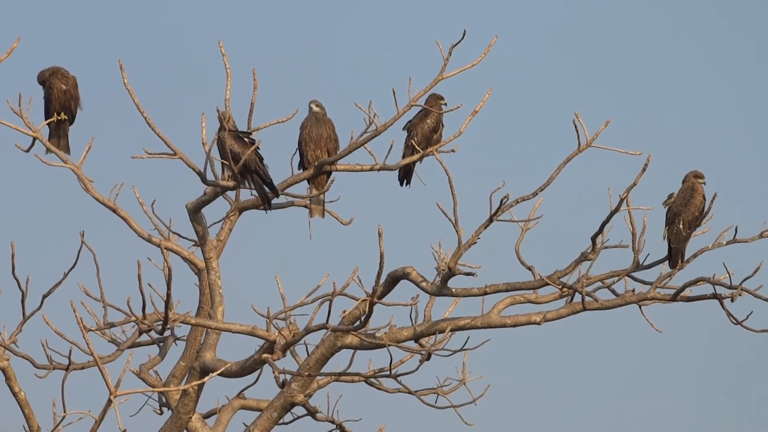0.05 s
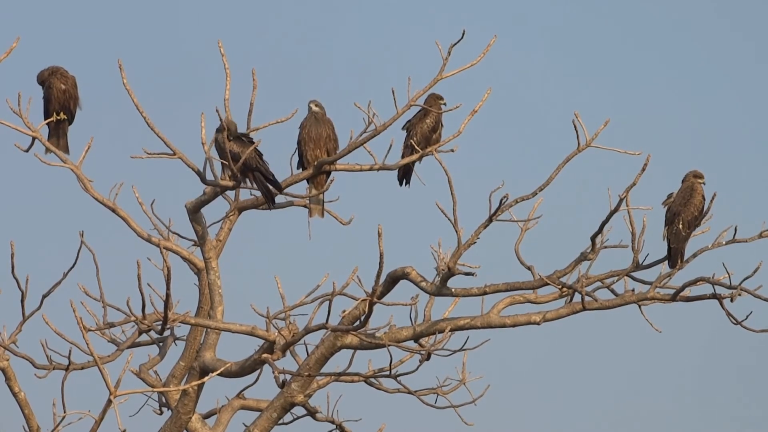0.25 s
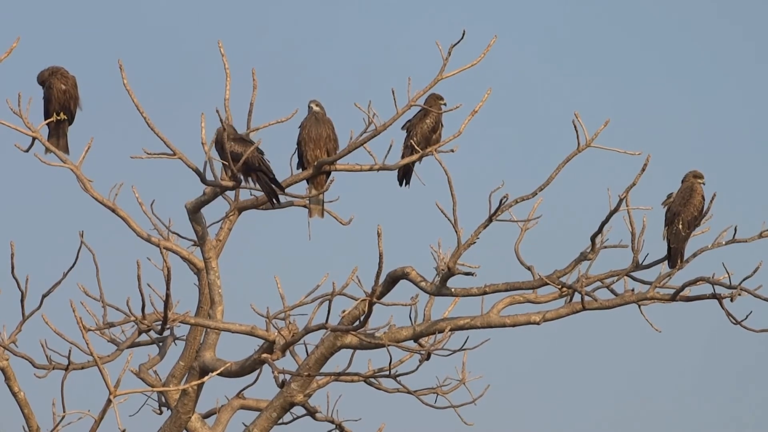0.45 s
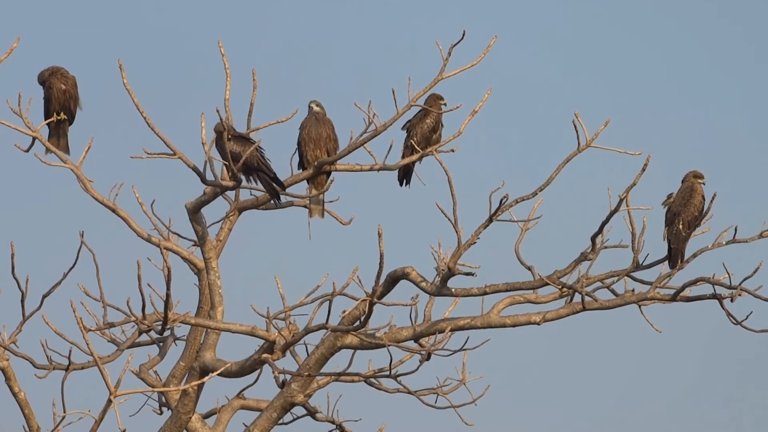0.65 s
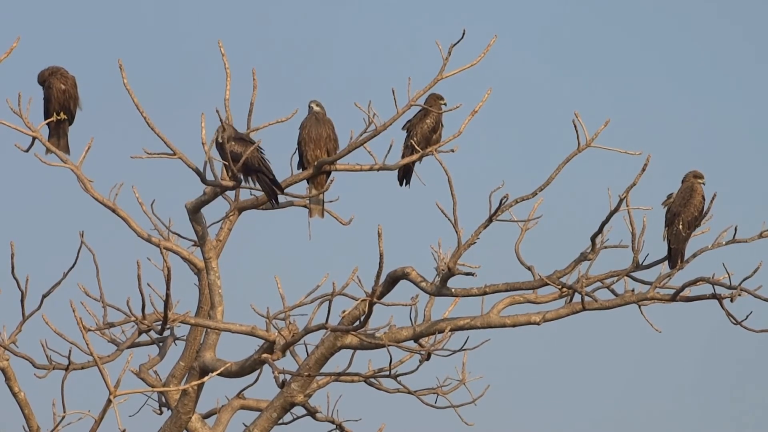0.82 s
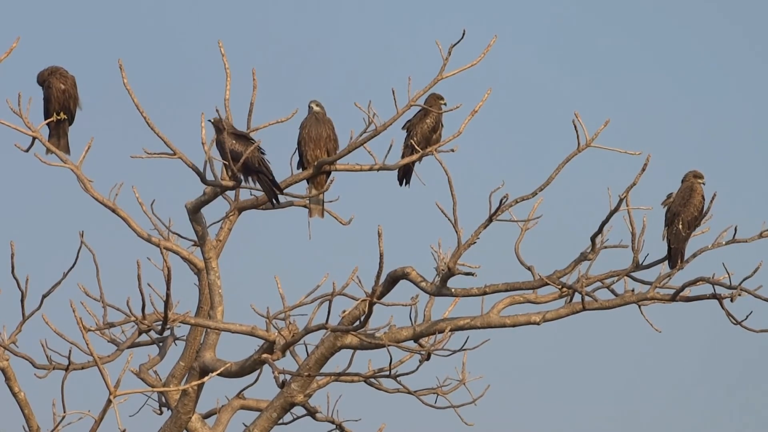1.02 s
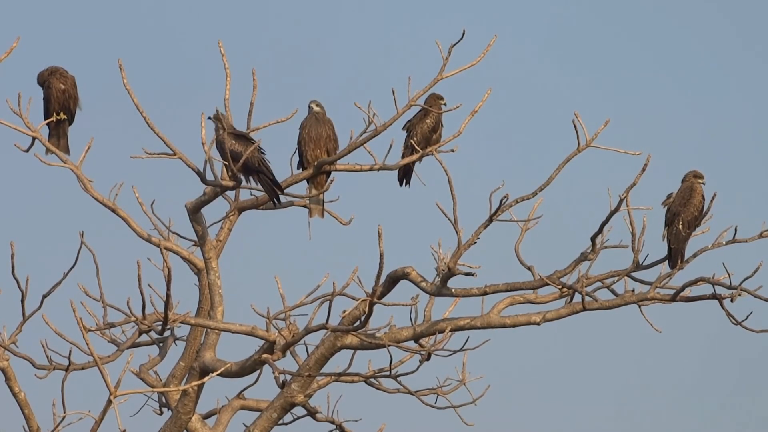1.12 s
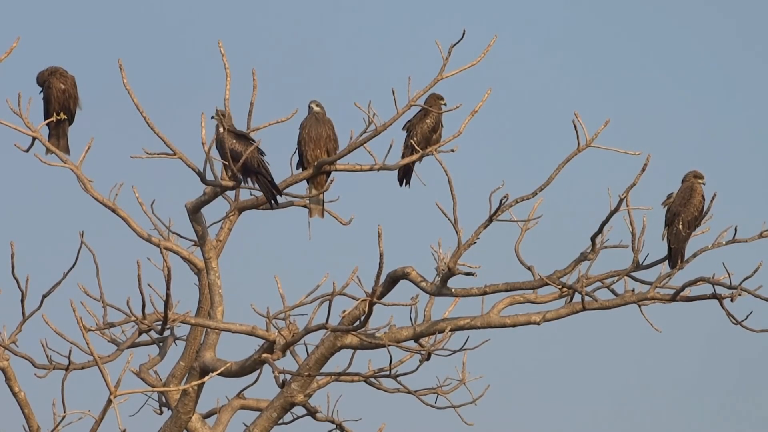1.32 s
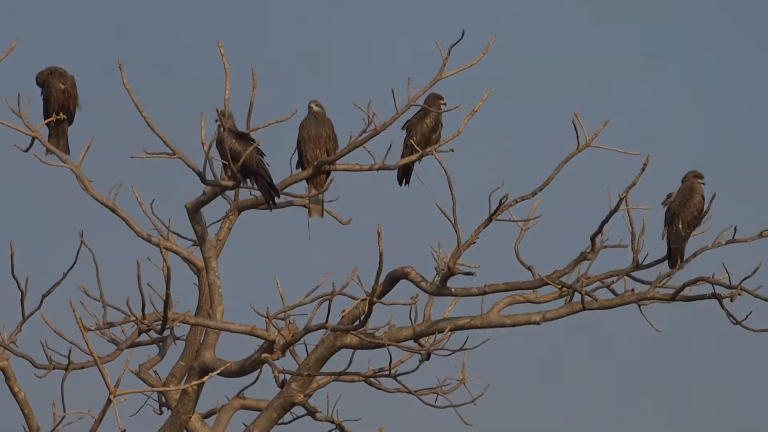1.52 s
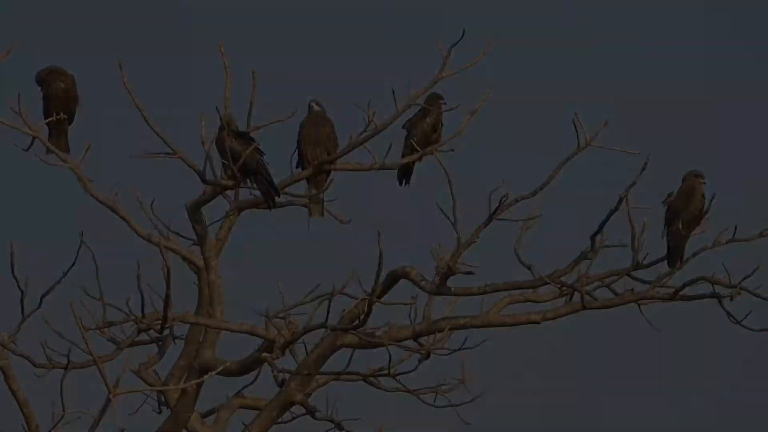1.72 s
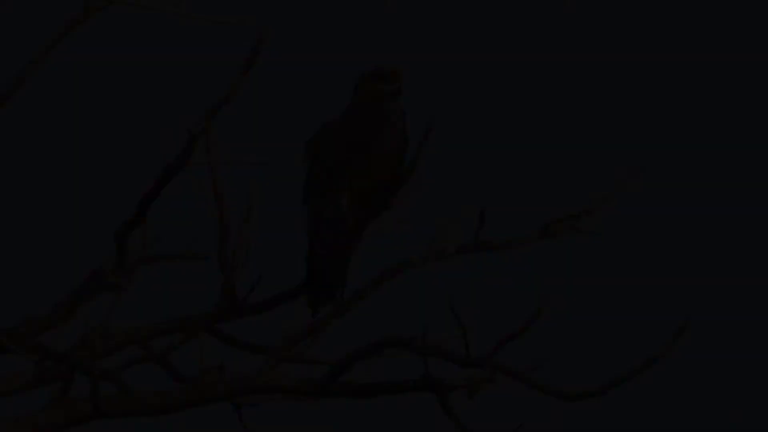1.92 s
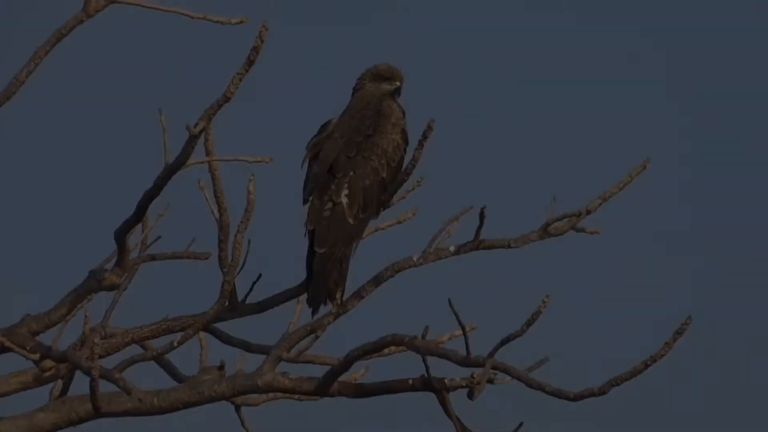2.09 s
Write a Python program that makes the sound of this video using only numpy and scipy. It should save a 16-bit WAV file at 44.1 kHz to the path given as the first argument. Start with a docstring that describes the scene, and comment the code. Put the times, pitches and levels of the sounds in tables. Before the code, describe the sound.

A bird of prey's thin, gliding whistle outdoors, with wind rumble and faint chirps.

```python
"""Over a quiet outdoor hiss, gusts of wind buffet the microphone throughout. Kites perch in a bare tree:
as earlier whistling dies away, a thin whistle sweeps up and down, rasps at its breaks and scatters
back from the trees around. Two soft knocks and a faint feathery rustle pass. Then a small bird ticks
twice among distant peeps and small dry snaps, and at the end a far crow gives two hoarse caws."""
import sys
import numpy as np
from scipy import signal
from scipy.fft import rfft, irfft
from scipy.io import wavfile
from scipy.ndimage import uniform_filter1d

SR = 44100
rng = np.random.default_rng(int(sys.argv[2]) if len(sys.argv) > 2 else 0)


def dump(signal):
    """Clip the signal to [-1, 1] and save it as 16-bit WAV at the path in sys.argv[1]."""
    limited = np.clip(np.atleast_2d(signal).T, -1, 1)
    pcm = np.round(limited * 32767).astype(np.int16)
    wavfile.write(sys.argv[1], SR, pcm)


N = 94815
TIME = np.arange(N) / SR
SIDE = np.array([[1], [-1]])   # adds to the left, subtracts from the right


def from_db(db):
    """Decibels to gain."""
    return 10 ** (np.asarray(db) / 20)


def unit_rms(x):
    """Scale to an rms of 1."""
    return x / np.sqrt(np.mean(x ** 2) + 1e-20)


def curve(points):
    """Automation line through (t/s, value) points."""
    return np.interp(TIME, *np.transpose(points))


def drift(rate_hz):
    """Random modulator: noise low-passed at the given rate, with an rms of 1."""
    pole = np.exp(-2 * np.pi * rate_hz / SR)
    return unit_rms(signal.lfilter([1], [1, -2 * pole, pole * pole], rng.standard_normal(2 * N))[N:])


def colour(x, eq):
    """Equalise by (f/Hz, gain/dB) points joined on a log frequency axis."""
    hz, db = np.transpose(eq)
    bins_hz = np.arange(N // 2 + 1) * SR / N
    return irfft(rfft(x) * from_db(np.interp(np.log(bins_hz + 1), np.log(hz), db)), N)


def noise(spectrum):
    """Coloured noise with an rms of 1."""
    return unit_rms(colour(rng.standard_normal(N), spectrum))


def stereo_noise(spectrum, width):
    """Mid/side noise whose width depends on frequency."""
    return noise(spectrum) + SIDE * colour(noise(spectrum), width)


def phase_of(hz):
    """Running phase of a pitch curve."""
    return 2 * np.pi * np.cumsum(hz) / SR


def bell(offset, spread):
    """Gaussian swell that peaks at 1 where the offset is zero."""
    return np.exp(-.5 * (offset / spread) ** 2)


def scatter(x, t60_s, build_s):
    """Countless small reflections from twigs and leaves, building up and dying away."""
    envelope = from_db(-60 * TIME / t60_s) * (1 - np.exp(-(TIME / build_s) ** 2))
    mid, side = rng.standard_normal((2, N)) * envelope
    response = unit_rms(mid + from_db(-14.5) * side * SIDE) / np.sqrt(N)
    return signal.fftconvolve(x[None], response, axes=1)[:, :N]


def trees(x):
    """Near trees send back a short tail, far trees a longer, softer one."""
    near = from_db(-8) * scatter(x, t60_s=0.38, build_s=0.0058)
    far = from_db(-11.5) * scatter(x, t60_s=0.94, build_s=0.0058)
    return near + far


def outdoor_hiss():
    """A quiet, wide bed of air whose level barely moves."""
    spectrum = [(40, -0.5), (120, 0.5), (210, -5.5), (300, -17), (600, -15), (900, -21), (1400, -25),
                (3000, -30.5), (7000, -33.5), (9000, -35), (12000, -40)]   # tone of the hiss: f/Hz, level/dB
    width = [(100, -15.5), (500, -2.5), (1500, 1.5), (3000, -2), (6000, -4), (10000, -27.5)]   # side against mid: f/Hz, gain/dB
    ride = [(0, 0), (1.0, 1.1), (1.92, 2.66), (1.96, 0.5), (2.15, 1.5)]   # slow level ride: t/s, gain/dB
    return from_db(-68 + curve(ride)) * stereo_noise(spectrum, width)


def wind():
    """Turbulence at the microphone: a fluttering rumble that follows the gusts."""
    gusts = [(0, -69), (.1, -64), (.2, -64), (.28, -70), (.38, -54.5), (.47, -46), (.58, -50), (.72, -61.5),
             (.8, -59.5), (.88, -48.5), (1.0, -61.5), (1.09, -53), (1.15, -64), (1.39, -59), (1.46, -48),
             (1.62, -59.5), (1.71, -50.5), (1.82, -64.5), (1.88, -52.5), (1.95, -67.5), (2.15, -60)]   # strength of the turbulence: t/s, level/dB
    spectrum = [(20, -6.5), (45, 4.5), (90, 0), (140, -6.5), (210, -12), (300, -20.5), (450, -29),
                (900, -43.5), (2000, -61), (6000, -110)]   # tone of the rumble: f/Hz, level/dB
    width = [(30, -11), (80, -11), (150, -6.5), (260, 0.5), (600, -2.5)]   # side against mid: f/Hz, gain/dB
    return from_db(curve(gusts) + 3.65 * drift(25)) * stereo_noise(spectrum, width)


def whistle_tail():
    """Earlier whistling, blurred to a band of noise, still dying away in the trees."""
    spectrum = [(2600, -50), (3300, 0.5), (3800, -2), (4200, 4), (4700, -8), (5500, 4), (6300, -20),
                (7500, -53)]   # tone of the tail: f/Hz, level/dB
    t60_s = 0.87
    return from_db(-75 - 60 * TIME / t60_s) * noise(spectrum)


def whistle():
    """A kite's nearly pure tone glides through each note, rougher in fast sweeps, and echoes back."""
    notes = [
        [(0.0, 3236, -62.5), (0.010, 3360, -58.5), (0.019, 3520, -64), (0.027, 2930, -70)],
        [(0.083, 3940, -69), (0.102, 4480, -78), (0.114, 4300, -85), (0.125, 4123, -58), (0.135, 3590, -77),
         (0.147, 3423, -55), (0.157, 3287, -62), (0.166, 3386, -63.5), (0.177, 4400, -64.5)],
        [(0.178, 4250, -76), (0.187, 4710, -58.5), (0.193, 4810, -52.5), (0.203, 5100, -52.5),
         (0.214, 5320, -50.5), (0.222, 5720, -43.5), (0.230, 6300, -67), (0.238, 5660, -48), (0.246, 4650, -55),
         (0.254, 3830, -70.5), (0.260, 3400, -53.5), (0.270, 2500, -83.5)],
        [(0.338, 5620, -85), (0.345, 5160, -51.5), (0.350, 4200, -83), (0.355, 2800, -61.5)],
        [(0.348, 7000, -74), (0.353, 5436, -52.5), (0.358, 4580, -60.5), (0.364, 3770, -65),
         (0.370, 3200, -62.5), (0.380, 3230, -65), (0.390, 3250, -58.5)],
        [(0.396, 4180, -66), (0.405, 3300, -66), (0.413, 2650, -78.5)],
        [(0.402, 6090, -58), (0.408, 5120, -62), (0.419, 4070, -65), (0.428, 3500, -64), (0.440, 3300, -65.5)],
        [(0.488, 5760, -62), (0.498, 5540, -54), (0.510, 5265, -57.5), (0.526, 4680, -51.5),
         (0.534, 4360, -68.5), (0.546, 3970, -67), (0.556, 3840, -66.5), (0.580, 3740, -68.5),
         (0.597, 3950, -64.5), (0.605, 4140, -59.5), (0.618, 4317, -61.5), (0.632, 4150, -56.5),
         (0.643, 3710, -78)],
    ]   # one contour per note: t/s, f/Hz, level/dB
    echoes = [(.0045, -7), (0.054, -19)]   # reflections off near surfaces: delay/s, gain/dB
    waver, break_waver = 0.0064, 0.024   # fractions of the pitch
    break_hz_per_s, fade_s, overtone_db = 108000, 0.0016, -43.5
    voice = np.zeros(N)
    for note in notes:
        t, hz, db = np.transpose(note)
        pitch = uniform_filter1d(np.interp(TIME, t, hz), size=200)   # rounds the corners
        strain = np.minimum(abs(np.gradient(pitch)) * SR / break_hz_per_s, 1)
        phase = phase_of(pitch * (1 + waver * drift(150) + break_waver * strain * drift(500)))
        tone = np.sin(phase) + from_db(overtone_db) * np.sin(2 * phase)
        gate = np.clip(np.minimum(TIME - t[0], t[-1] - TIME) / fade_s, 0, 1)
        voice += gate * from_db(np.interp(TIME, t, db)) * tone
    flutter_db = 1.6 * drift(90)
    voice *= np.sqrt(2) * from_db(-2.5 + flutter_db)
    slaps = sum(from_db(db) * np.interp(TIME - delay, TIME, voice, left=0) for delay, db in echoes)
    return voice + slaps + trees(voice)


def buffets():
    """Single eddies hit the microphone as short pressure swings, each skewed between left and right."""
    eddies = [(0.153, -42.5, 87.5), (.351, -42, 80), (.423, -27.5, 94.7), (.437, -28.5, 121),
              (0.479, -56, 73.3), (.493, -30.5, 170), (0.503, -34.5, 92), (0.525, -40, 80), (0.55, -41, 80),
              (.574, -33, 141), (0.651, -43, 89), (.853, -41, 99.6), (.898, -41, 173), (0.927, -40.5, 109),
              (0.942, -44, 130), (1.094, -40.5, 113), (1.276, -39.5, 116), (1.328, -46.5, 82.4),
              (1.435, -30, 125), (1.451, -36.5, 83.6), (1.501, -37, 87.5), (1.562, -43.5, 112),
              (1.599, -39, 83.5), (1.635, -47.5, 115), (1.7, -34.5, 103.6), (1.737, -48, 81),
              (1.785, -52, 67.6), (1.874, -43.5, 97), (1.886, -43, 73)]   # the strongest hits: t/s, peak/dB, f/Hz
    out = np.zeros((2, N))
    for t, db, hz in eddies:
        cycles = (TIME - t) * hz
        skew = 0.39 * hz / 100 * rng.standard_normal()
        swing = -np.cos(2 * np.pi * cycles + skew * SIDE)
        out += from_db(db) * swing * bell(cycles, spread=0.31)
    return out


def rasp():
    """Short bursts of breathy treble where the whistle breaks."""
    breaks = [(0.189, -79), (.245, -85), (0.351, -79.5), (0.413, -79)]   # breaks in the voice: t/s, level/dB
    spectrum = [(4000, -35), (6500, 5.5), (8500, 6.5), (10000, -7), (12000, -3)]   # tone of the breath: f/Hz, level/dB
    envelope = sum(from_db(db) * bell(TIME - t, spread=0.0071) for t, db in breaks)
    breath = envelope * noise(spectrum)
    return breath + trees(breath)


def knocks():
    """Soft knocks at the microphone, each a brief damped ring."""
    hits = [(0.3896, -40.5, 322, 0.013), (0.8975, -59.5, 686, 0.036)]   # one ring per knock: t/s, level/dB, f/Hz, t60/s
    out = np.zeros(N)
    for t, db, hz, t60 in hits:
        age = np.maximum(TIME - t, 0)
        attack = 1 - np.exp(-4 * age * hz)
        out += from_db(db - 60 * age / t60) * attack * np.sin(2 * np.pi * hz * age)
    return out


def rustle():
    """Faint feathery swells of treble noise."""
    swells = [(0.88, .04, -83.5), (1.904, 0.012, -80.5)]   # one swell per rustle: t/s, spread/s, level/dB
    spectrum = [(2500, -17), (4500, -4), (6500, 7), (9000, -7), (12000, -13)]   # tone of the rustle: f/Hz, level/dB
    envelope = sum(from_db(db) * bell(TIME - t, spread) for t, spread, db in swells)
    return envelope * noise(spectrum)


def ticks():
    """A small bird's ticks: each a pair of fast, rough pitch arches with some hiss, smeared by foliage."""
    calls = [(1.324, 7200, -62), (1.776, 6730, -64)]   # the ticks: t/s, top f/Hz, level/dB
    spectrum = [(3000, -25), (5000, 5.5), (6500, 4), (8500, -6), (11000, -17)]   # tone of their hiss: f/Hz, level/dB
    arch_s, repeat_s, repeat_db = 0.0099, 0.013, -3
    sweep, roughness = 0.36, 0.0281   # fractions of the pitch
    hiss = from_db(-10) * noise(spectrum)
    out = np.zeros(N)
    for t, top_hz, db in calls:
        for k in range(2):
            progress = np.clip((TIME - t - k * repeat_s) / arch_s, 0, 1)
            pitch = top_hz * (1 - sweep * (2 * progress - 1) ** 2) * (1 + roughness * drift(600))
            envelope = from_db(db + k * repeat_db) * np.sin(np.pi * progress)
            out += envelope * (np.sin(phase_of(pitch)) + hiss)
    smear = from_db(-0.5) * scatter(out, t60_s=0.1, build_s=0.0062)
    tail = from_db(-3.5) * scatter(out, t60_s=0.7, build_s=0.014)
    return out + smear + tail


def peeps():
    """Short, soft sine glides from distant birds."""
    glides = [(1.415, 0.016, 3400, 3700, -81), (1.535, 0.022, 3300, 3150, -80.5),
              (1.625, 0.026, 3300, 3600, -76.5), (1.665, 0.014, 3550, 3400, -76.5),
              (1.715, 0.013, 3600, 3400, -77), (1.98, 0.028, 5700, 6550, -81),
              (2.06, 0.017, 6450, 5850, -90), (2.112, 0.026, 6600, 5900, -79.5)]   # one glide per peep: t/s, length/s, start f/Hz, end f/Hz, level/dB
    out = np.zeros(N)
    for t, length, start_hz, end_hz, db in glides:
        progress = np.clip((TIME - t) / length, 0, 1)
        pitch = start_hz + (end_hz - start_hz) * progress
        out += from_db(db) * np.sin(np.pi * progress) * np.sin(phase_of(pitch))
    return out + trees(out)


def snaps():
    """Small dry snaps: bands of noise that die within milliseconds and scatter off the trees."""
    bursts = [(1.612, -61.5, 2260, 0.27), (1.614, -64, 5600, 0.61), (1.726, -70, 2180, 1.2),
              (1.903, -65, 1370, 0.47), (1.922, -70, 3220, 1.3), (1.936, -74, 2500, 1.7)]   # one burst per snap: t/s, level/dB, centre f/Hz, width/octaves
    decay_s = 0.003
    out = np.zeros(N)
    for t, db, hz, octaves in bursts:
        edges_hz = hz * 2 ** (octaves * np.array([-.5, .5]))
        band = signal.butter(2, edges_hz, "band", fs=SR, output="sos")
        burst = unit_rms(signal.sosfilt(band, rng.standard_normal(N)))
        age = np.maximum(TIME - t, 0)
        out += from_db(db) * burst * np.minimum(age * hz, 1) * np.exp(-age / decay_s)
    return out + trees(out)


def crow():
    """A far crow's hoarse harmonic caws sag in pitch as they end and ring on in the trees."""
    caws = [(1.918, 0.058, 519, -70.5), (2.046, 0.11, 490, -65.5)]   # the calls: t/s, length/s, f/Hz, level/dB
    harmonics = [-6, 0, -18, -20, -29]   # from the fundamental upward: level/dB
    sag, roughness = 0.04, 0.028   # fractions of the pitch
    rough_hz, flutter_db = 90, 2.5
    out = np.zeros(N)
    for t, length, hz, db in caws:
        progress = np.clip((TIME - t) / length, 0, 1)
        phase = phase_of(hz * (1 - sag * progress ** 3) * (1 + roughness * drift(rough_hz)))
        voice = sum(from_db(level) * np.sin(k * phase) for k, level in enumerate(harmonics, 1))
        envelope = np.sqrt(abs(np.sin(np.pi * progress)))
        out += from_db(db + flutter_db * drift(rough_hz)) * envelope * voice
    return out + from_db(-4) * scatter(out, t60_s=0.53, build_s=0.013)


def scene():
    """Kites and the ticking bird slightly to the right, the small sounds central, wind and hiss all round."""
    pan = from_db(-3.2 / 2 * SIDE)   # left 3.2 dB under right
    birds = pan * (whistle() + rasp() + whistle_tail() + ticks())
    return birds + outdoor_hiss() + peeps() + snaps() + knocks() + rustle() + crow() + wind() + buffets()


def record(dry):
    """A steep low-pass takes off the very top."""
    cutoff_hz = 12400
    return signal.sosfilt(signal.ellip(10, .1, 70, cutoff_hz, fs=SR, output="sos"), dry)


dry = scene()
out = record(dry)
dump(out)
```